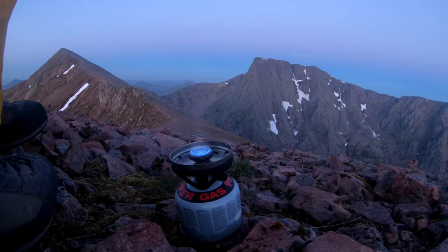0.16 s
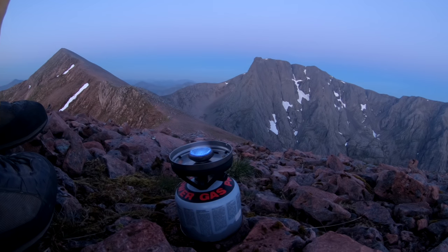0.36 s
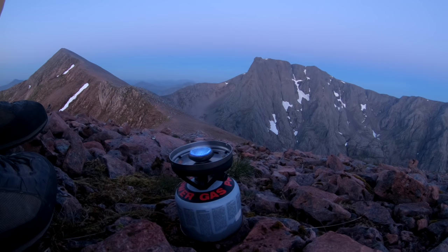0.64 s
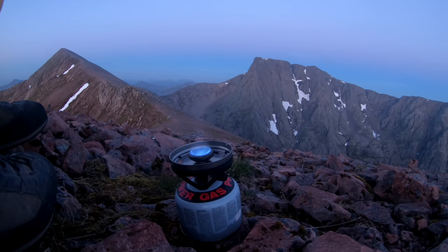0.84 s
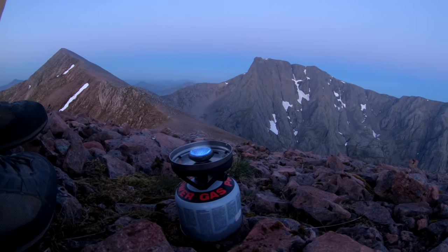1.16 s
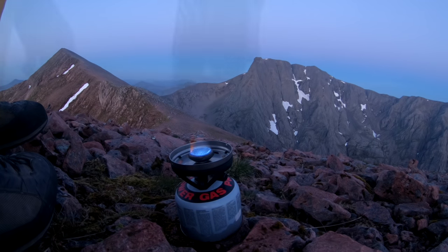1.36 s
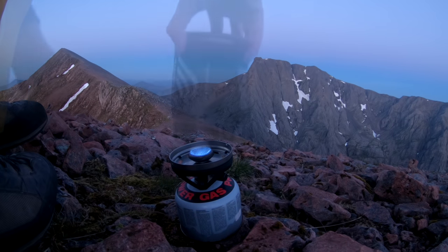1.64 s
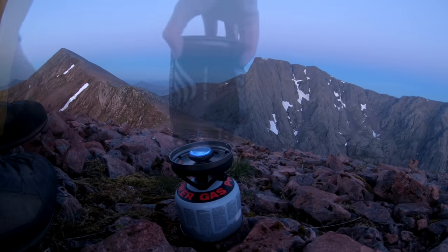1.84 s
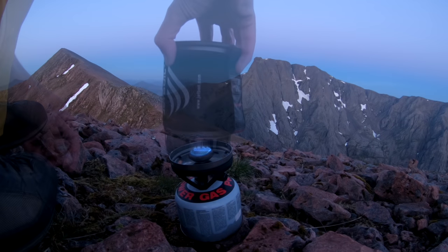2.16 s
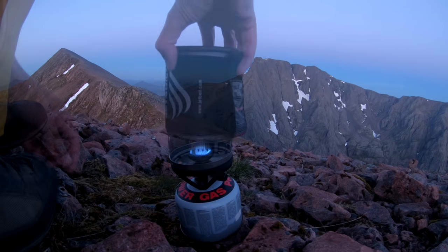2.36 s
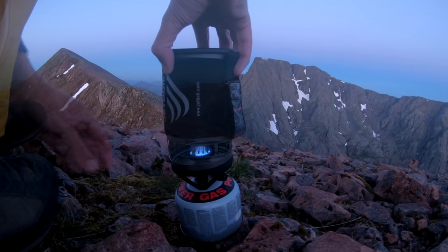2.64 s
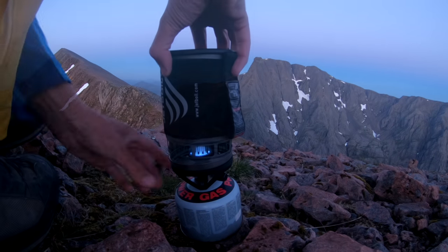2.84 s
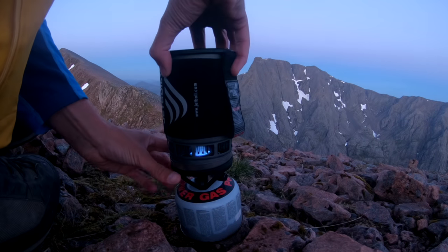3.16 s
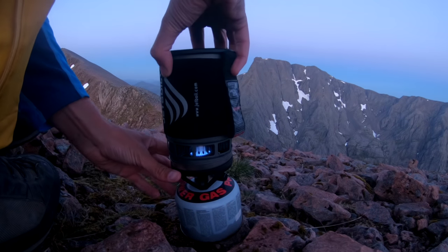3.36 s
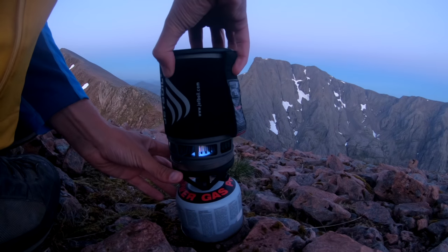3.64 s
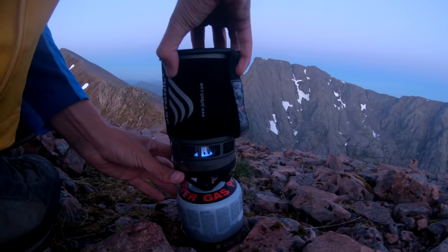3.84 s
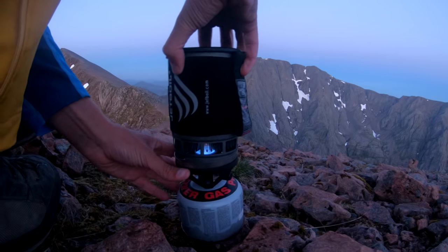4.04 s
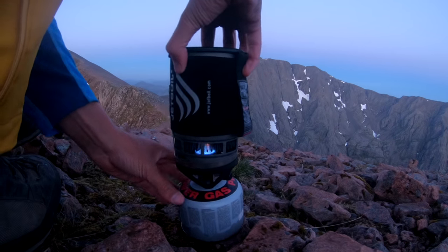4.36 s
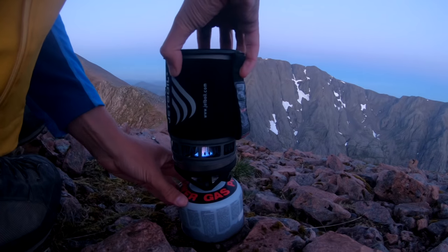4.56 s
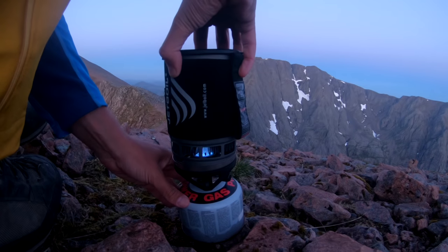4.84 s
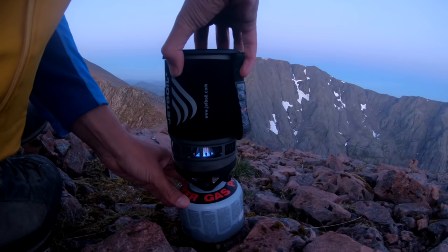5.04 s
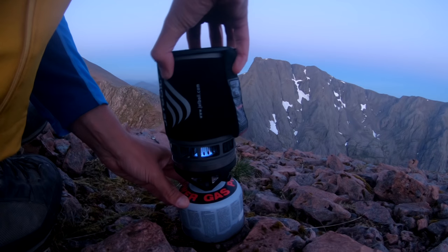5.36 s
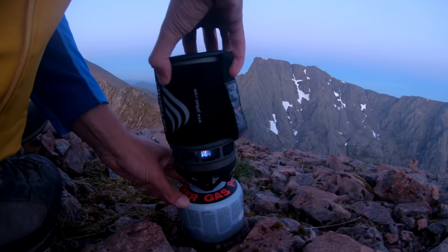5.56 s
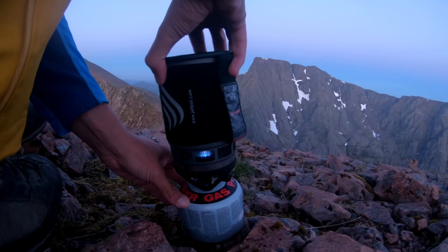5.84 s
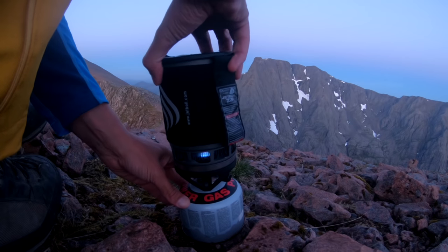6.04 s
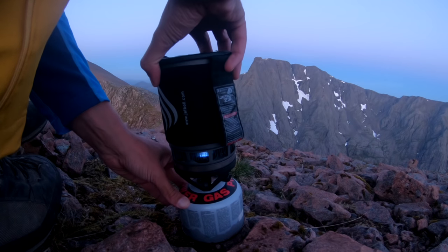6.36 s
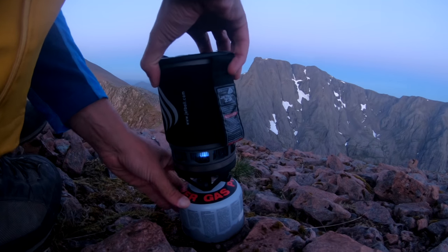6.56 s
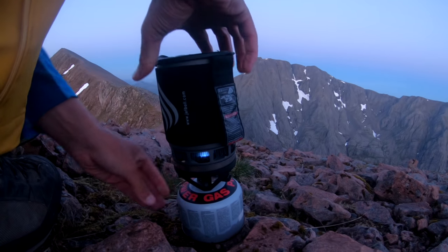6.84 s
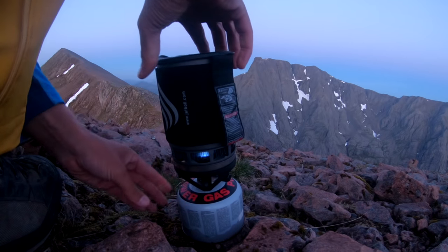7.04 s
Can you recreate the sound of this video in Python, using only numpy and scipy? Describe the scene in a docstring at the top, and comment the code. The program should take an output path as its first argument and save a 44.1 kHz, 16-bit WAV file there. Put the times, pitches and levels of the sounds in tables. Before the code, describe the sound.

A small gas stove roars and hisses steadily outdoors as a metal cup clinks, scrapes and knocks into place, dulling the hiss.

```python
"""A camping gas burner roars low and its jet hisses on an open, stony summit: coloured noise with random swells.
A loose stone chinks early on, as modes struck by a short burst of noise.
A metal cup lowered over the flame shuts the hiss in to dull vent noise; hand and cup brush in soft treble rustles.
Twisted home, it clinks and scrapes on the burner ring: modes excited by cracks and by dense tiny catches.
The canister knocks on the rock as short damped modes; a sleeve swishes in noise strokes as the hand draws back."""
import sys
import numpy as np
from scipy import signal
from scipy.fft import rfft, irfft
from scipy.io import wavfile
from scipy.ndimage import uniform_filter1d

SR = 44100
rng = np.random.default_rng(int(sys.argv[2]) if len(sys.argv) > 2 else 0)


def master_out(mix):
    """Clip the mix to full scale and print it as 16-bit PCM to the path in sys.argv[1]."""
    frames = np.transpose(np.atleast_2d(mix))
    ceiling = np.clip(frames, -1, 1)
    pcm = np.round(ceiling * 32767).astype(np.int16)
    wavfile.write(sys.argv[1], SR, pcm)


N = 317696
T = np.arange(N) / SR
FREQ = np.maximum(np.arange(N // 2 + 1) * SR / N, 1)


def undb(db):
    """Decibel law: the amplitude ratio of a level in dB."""
    return 10 ** (np.asarray(db) / 20)


def unit(x):
    """Normalisation: scale to rms 1."""
    return x / np.sqrt(np.mean(x ** 2))


def unit_attack(x):
    """Onset normalisation: scale a blow so that its first 5 ms have rms 1."""
    return x / np.sqrt(np.mean(x[:SR // 200] ** 2))


def curve(rows):
    """Level envelope: gain interpolated in dB along (start_s, level_db) points."""
    return undb(np.interp(T, *np.transpose(rows)))


def colour(x, points):
    """Linear filtering by a (pitch_hz, level_db) spectrum that falls 48 dB per octave beyond both ends."""
    hz, db = np.transpose(points)
    octaves_below = np.maximum(np.log2(hz[0] / FREQ), 0)
    octaves_above = np.maximum(np.log2(FREQ / hz[-1]), 0)
    gain_db = np.interp(np.log(FREQ), np.log(hz), db) - 48 * (octaves_below + octaves_above)
    return irfft(rfft(x) * undb(gain_db), N)


def noise(points):
    """Spectral shaping: white noise coloured to a spectrum, at rms 1."""
    return unit(colour(rng.standard_normal(N), points))


def walk(rate_hz):
    """Low-pass random modulation: a smooth fluctuation of rms 1, slower than about rate_hz."""
    spectrum = rfft(rng.standard_normal(N))
    return unit(irfft(spectrum / (1 + (FREQ / rate_hz) ** 4), N))


def steady(x, window_s):
    """Short-time levelling: take the slow swells out of a noise, leaving its quick turbulence."""
    return x / np.sqrt(uniform_filter1d(x ** 2, int(window_s * SR)) + 1e-9)


def since(s):
    """Elapsed time: seconds passed since s, zero before."""
    return np.maximum(T - s, 0)


def hump(middle_s, length_s):
    """Raised-cosine envelope: a smooth swell from 0 to 1 and back."""
    return np.cos(np.pi * np.clip((T - middle_s) / length_s, -.5, .5)) ** 2


def thinning(s, length_s, db):
    """Asymmetric envelope: a noise starts quickly, thins out by 12 dB over its length, then ends."""
    attack = np.minimum(since(s) / 0.069, 1)
    release = np.maximum(1 - since(s + length_s) / 0.05, 0)
    return attack * release * undb(db - 12 * since(s) / length_s)


def fade(t, t60):
    """Exponential decay: the amplitude falls 60 dB in t60 seconds."""
    return np.exp(-np.log(1000) * t / t60)


def ring(modes, detune=0, scatter_db=0):
    """Modal superposition: damped sines, with random phase and scattered pitch and strength."""
    t = T[:SR // 3]
    total = np.zeros(len(t))
    for hz, db, t60 in modes:
        pitch_chance, phase_chance, level_chance = rng.uniform(-1, 1, 3)
        phase = 2 * np.pi * hz * (1 + detune * pitch_chance) * t + np.pi * phase_chance
        total += undb(db + scatter_db * level_chance) * fade(t, t60) * np.sin(phase)
    return total


def add(out, s, x):
    """Superposition: mix x in at time s."""
    i = int(s * SR)
    out[i:i + len(x)] += x[:N - i]


def crack_noise(grit, s, t60, tail_db, tail_t60):
    """Impact noise: a piece of grit with a fast decay and a fainter, slower tail."""
    t = T[:SR // 3]
    return np.roll(grit, -int(s * SR))[:len(t)] * (fade(t, t60) + undb(tail_db) * fade(t, tail_t60))


def struck(rows, modes, crack_colour, crack_t60, scatter_db=0):
    """Impact excitation: the modes of one object ring over a short crack of noise."""
    out, t = np.zeros(N), T[:SR // 3]
    grit = noise(crack_colour)
    for s, ring_db, crack_db in rows:
        crack = crack_noise(grit, s, crack_t60, tail_db=-22, tail_t60=0.22)
        ringing = ring(modes, detune=0.0011, scatter_db=scatter_db)
        blow = undb(ring_db) * ringing + undb(crack_db) * crack
        add(out, s, blow * np.minimum(t / 0.0011, 1))  # 1.1 ms rise
    return out


# spectra of the roar and of the low flutter: pitch_hz [Hz], level_db [dB per Hz]
ROAR_SPECTRUM = [(90, -46.5), (125, -15), (150, 1), (185, -2.5), (215, -7), (270, -10), (330, -18),
                 (390, -22), (450, -28), (540, -36), (700, -40.5), (900, -59), (1300, -62)]
FLUTTER_SPECTRUM = [(15, -35), (28, -15.5), (48, -19.5), (80, -10.5), (110, -9), (150, -15.5), (300, -37.5)]
# filter for the deep part of the roar, which throbs and swells: pitch_hz [Hz], level_db [dB]
DEEP_FILTER = [(60, -4), (230, -6), (420, -10.5)]
# spectrum of the hollow middle range: pitch_hz [Hz], level_db [dB per Hz]
HOLLOW_SPECTRUM = [(350, -4.5), (560, 2), (700, 1), (830, -1), (950, -15.5), (1250, -23)]
# level of the hollow middle range: start_s [s], level_db [dB]
HOLLOW_LEVEL = [(0, -70.5), (1.5, -68.5), (2.4, -65.5), (3.6, -65.5), (4.15, -63), (4.5, -67), (4.7, -61.5),
                (5.05, -65.5), (5.95, -62.5), (6.55, -64), (6.78, -59.5), (7.2, -61.5)]
# strength of the flame before its parts are weighted: start_s [s], level_db [dB]
FLAME_LEVEL = [(0, -36.5), (2.0, -38.5), (3.1, -36.5), (3.6, -37.5), (4.2, -34), (5.0, -38), (6.7, -37),
               (7.2, -40.5)]
# puffs when a draught or the cup disturbs the flame:
# middle_s [s], length_s [s], roar_rise_db [dB], flutter_db [dB]
FLAME_PUFFS = [(0.21, 0.078, 5, -40.5), (0.532, 0.13, 3, -40.5), (0.91, 0.099, 9.5, -44.5),
               (1.149, 0.2, 9.5, -43), (1.531, 0.16, 7, -48), (1.773, 0.13, 5.5, -40.5),
               (1.867, .06, 14.5, -48), (2.193, 0.059, 18, -40.5), (2.357, .2, 10.5, -41.5),
               (2.528, 0.15, 13.5, -47), (2.861, 0.12, 12, -53), (3.245, 0.14, 1.5, -42.5),
               (3.768, 0.14, 13.5, -43.5), (3.851, 0.13, 14, -38.5), (4.708, 0.44, 4.5, -46),
               (5.094, 0.13, 7, -40.5), (5.5, 0.089, 14.5, -55.5), (5.606, 0.23, 12.5, -35.5),
               (6.834, 0.12, 8.5, -43)]
LOWER_S, SEAT_S = 1.19, 2.4  # the cup begins to sink; it sits on the burner ring


def flame():
    """Turbulent combustion noise: a roar with throbbing depth and hollow middle, over a low flutter."""
    deep_swell_db = 3 * walk(27)
    flutter_gain = undb(-52.5 + 0.5 * walk(5.8))  # flutter in calm air
    for middle_s, length_s, roar_rise_db, flutter_db in FLAME_PUFFS:
        puff = hump(middle_s, length_s)
        deep_swell_db = deep_swell_db + roar_rise_db * puff
        flutter_gain = flutter_gain + undb(flutter_db) * puff
    roar = steady(noise(ROAR_SPECTRUM), window_s=.12) * curve(FLAME_LEVEL)
    deep = colour(roar, DEEP_FILTER)
    # the upper part is weaker until the cup sits over the flame
    body = (roar - deep) * curve([(LOWER_S, -3), (SEAT_S, .7)])
    hollow = noise(HOLLOW_SPECTRUM) * curve(HOLLOW_LEVEL) * undb(1.1 * walk(28))
    flutter = steady(noise(FLUTTER_SPECTRUM), window_s=0.27) * flutter_gain
    return deep * undb(deep_swell_db) + body + hollow + flutter


# spectra of the open jet and the vents: pitch_hz [Hz], level_db [dB per Hz]
JET_SPECTRUM = [(1000, -30.5), (1400, -16.5), (1800, -3), (2550, 1), (3050, -7), (3650, -4.5), (4000, -6),
                (4300, -4.5), (5050, -10), (5800, 0), (6300, -7.5), (7400, -12), (8100, -14), (9500, -28.5)]
VENT_SPECTRUM = [(1280, -22.5), (1650, 0), (2050, 8), (2350, 0), (2750, -1), (3400, -12), (3700, -12),
                 (4000, -24), (5050, -26), (5600, -47)]
# burner through the vents of the cup, before a further 7 dB cut: start_s [s], level_db [dB]
VENT_LEVEL = [(0, -65), (1.5, -55.5), (2.4, -54), (3.2, -57), (4.15, -52), (5.3, -55), (6.05, -53.5),
              (6.5, -54.5), (6.9, -54.5), (7.02, -60.5), (7.2, -58)]
# the jet breaks out as the cup is lifted and reset: start_s [s], length_s [s], level_db [dB before thinning]
CUP_LIFT = (2.75, 0.6, -54)
# broad resonance of the burner head, screened and bared as cup and hand move: start_s [s], level_db [dB]
BURNER_HEAD_LEVEL = [(0, -56.5), (1.5, -61.5), (2.6, -63), (3.05, -56.5), (3.6, -67.5), (4.05, -66.5),
                     (4.45, -89), (4.9, -61), (5.1, -80.5), (5.85, -76.5), (6.03, -57.5), (6.5, -85.5),
                     (6.85, -70), (7.0, -57), (7.2, -59)]
SHUT_S = 2.987  # the cup begins to shut the jet in


def gas(burner_hz=2580):
    """Jet noise and screening: the open jet hisses; under the cup vents and head resonance remain."""
    # screening is far faster once the cup sits on the ring: 6, then 6 + 13.5 dB per second
    uncovered = undb(-52 - 6 * since(LOWER_S) - 13.5 * since(SEAT_S))
    shutting = undb(.5 * walk(39) - 118 * since(SHUT_S))  # 118 dB per second
    jet = noise(JET_SPECTRUM) * (uncovered + thinning(*CUP_LIFT)) * shutting
    vents = noise(VENT_SPECTRUM) * curve(VENT_LEVEL) * undb(-7.0 + 2.02 * walk(39))
    head_shape = [(0.66, -22), (.88, -11), (1, 0), (1.12, -10), (1.317, -18)]  # multiple of burner_hz, dB per Hz
    head_noise = noise([(ratio * burner_hz, db) for ratio, db in head_shape])
    head = head_noise * curve(BURNER_HEAD_LEVEL) * undb(2.0 * walk(17))
    return jet + vents + head


# pass bands of the cup's rim, wall and base: low_hz [Hz], high_hz [Hz]
CUP_BANDS = [(4860, 10000), (1490, 5000), (500, 1680)]
# modes of the cup: pitch_hz [Hz], level_db [dB], t60_s [s]
CUP_RESONANCES = [(627, -6.5, 0.18), (746, 9.5, 0.038), (960, -6.5, 0.028), (1845, 10.5, 0.052),
                  (1955, 14.5, 0.023), (2420, -1, 0.043), (3700, -2.5, 0.063), (3757, 1.5, 0.17),
                  (3880, -6, .07), (4800, -8.5, 0.099), (5240, -2, 0.075), (5650, 1, .07),
                  (5840, 2.5, 0.06), (5895, 8, 0.045), (6015, 2.5, .04), (6130, 5, 0.06), (6030, 1, .04),
                  (6450, -11, 0.09), (7200, -11, 0.071)]
# spectrum of the contact crack: pitch_hz [Hz], level_db [dB per Hz]
METAL_SPECTRUM = [(400, -13.5), (800, 13), (1300, -34), (1900, 8), (2700, 7.5), (3600, 5), (4200, 1),
                  (5000, 2.5), (6000, 8.5), (7300, -4.5), (9500, -7.5)]
# cup turning in the burner ring and catching: start_s [s], contact_s [s],
# rim_db [dB], wall_db [dB], base_db [dB], ring_share_db [dB, before a further 9 dB cut]
CUP_CLINKS = [(2.185, 0.0078, -64, -50, -91, -12), (2.324, 0.0033, -47, -44, -80, -5),
              (3.731, 0.0066, -48, -58.5, -49, -10), (3.807, 0.016, -68, -64.5, -56, -8.5),
              (3.8332, 0.0018, -33, -39, -37.5, -8), (3.844, 0.00096, -36, -41.5, -46, 0.5),
              (3.858, 0.0027, -46.5, -48.5, -65, -6.5), (4.052, 0.0022, -55.5, -60, -84, -19),
              (4.129, 0.0026, -65, -69, -51, -7), (4.244, 0.0044, -56, -55.5, -70.5, -26),
              (4.305, .0023, -56.5, -55, -71, -20), (5.314, 0.0054, -63.5, -64.5, -56, -14.5),
              (5.519, 0.0056, -57.5, -51.5, -52, -22), (5.762, 0.0038, -69, -61, -64, -27),
              (6.026, 0.0037, -62, -55, -74, -19), (6.101, 0.0023, -56, -52, -63, -18),
              (6.241, 0.0034, -71, -62, -86, -28)]


def cup_filters():
    """Band-pass filtering: one filter each for rim, wall and base."""
    return [signal.butter(3, band, "band", fs=SR, output="sos") for band in CUP_BANDS]


def clinks(crack_t60=0.0096, tail_db=-19, tail_t60=0.14, modes_db=-9):
    """Modal impact: each contact cracks and rings the hand-damped cup; its place weights rim, wall and base."""
    out, t = np.zeros(N), T[:SR // 3]
    grit = noise(METAL_SPECTRUM)
    filters = cup_filters()
    for s, contact_s, *part_db, ring_db in CUP_CLINKS:
        crack = crack_noise(grit, s, crack_t60, tail_db, tail_t60)
        ringing = ring(CUP_RESONANCES, detune=0.005, scatter_db=1.5)
        blow = crack + undb(modes_db + ring_db) * ringing
        blow = blow * np.minimum(t / contact_s, 1)  # the force builds up over the contact
        for sos, db in zip(filters, part_db):
            add(out, s, undb(db) * unit_attack(signal.sosfilt(sos, blow)))
    return out


# spectrum of the sliding contact: pitch_hz [Hz], level_db [dB per Hz, shapes the rasp]
SLIDE_SPECTRUM = [(1500, -10.5), (2600, -8), (3600, -7.5), (4150, -9.5), (4900, -8), (6000, -9),
                  (6800, -12.5), (7500, -23), (9000, -35)]
# cup base rubbing on the burner ring: start_s [s], length_s [s], level_db [dB, before build-up and unevenness]
CUP_RUBS = [(2.519, 0.016, -55), (3.802, 0.012, -64), (3.942, 0.015, -61), (4.128, 0.021, -59.5),
            (4.266, 0.054, -62), (4.606, 0.1, -70.5), (4.8, 0.042, -81.5), (5.452, 0.019, -63),
            (5.512, .03, -67), (5.539, 0.094, -52.5), (5.765, .04, -72.5), (5.853, 0.014, -69),
            (5.894, 0.053, -53.5), (5.995, 0.031, -59.5), (6.058, 0.047, -57.5), (6.728, 0.071, -67)]


def scrape(grain_db=2.5, grains_per_s=4500, ring_db=-20, unevenness_db=2.5, wander_db=2.5):
    """Stick-slip friction: dense tiny catches, smeared by the thin metal, excite the cup base."""
    happens = rng.random(N) < grains_per_s / SR
    strength = undb(grain_db * np.minimum(rng.exponential(size=N), 3))
    catches = happens * rng.choice([-1, 1], N) * strength
    t = T[:SR // 50]
    # the point of contact wanders, so each part of the cup answers with its own strength
    rasp = 0
    for sos in cup_filters():
        smear = rng.standard_normal(len(t)) * fade(t, .008)
        part = signal.sosfilt(sos, signal.fftconvolve(catches, smear)[:N])
        rasp = rasp + part * undb(wander_db * walk(45))
    rasp = unit(colour(rasp, SLIDE_SPECTRUM))
    singing = unit(signal.fftconvolve(rasp, ring(CUP_RESONANCES))[:N])
    pressure = np.zeros(N)
    for s, length_s, db in CUP_RUBS:
        grip = np.minimum(since(s) / .018, 1)
        easing = fade(since(s + length_s), 0.15)  # the hand eases
        pressure += undb(db) * grip * easing
    return pressure * undb(unevenness_db * walk(60)) * (rasp + undb(ring_db) * singing)


# cup base landing on the prongs of the burner: start_s [s], ring_db [dB], crack_db [dB]
PRONG_TAPS = [(2.313, -53, -48), (2.326, -45, -40), (2.5, -41, -41), (2.5025, -33.5, -37.5)]
# modes of the burner prongs: pitch_hz [Hz], level_db [dB], t60_s [s]
PRONG_RESONANCES = [(1805, -2.5, .018), (1907, 3, 0.029), (2080, -4.5, 0.031), (2536, -4, 0.056),
                    (2790, -3.5, 0.022), (3480, -9, .025), (3590, -0.5, 0.03), (3980, -6, 0.022),
                    (4370, -9, 0.022), (4760, -1, 0.052), (4870, -11, .02), (5060, -11, 0.082)]
# spectrum of the crack on a prong: pitch_hz [Hz], level_db [dB per Hz]
PRONG_SPECTRUM = [(1650, -14), (2800, 4), (4800, -1), (6500, -3), (9000, -12)]


def taps():
    """Modal impact: the descending cup finds the thin prongs of the burner, which ring briefly."""
    return struck(PRONG_TAPS, PRONG_RESONANCES, PRONG_SPECTRUM, crack_t60=0.022, scatter_db=-2.0)


# spectrum of the brushing: pitch_hz [Hz], level_db [dB per Hz]
BRUSH_SPECTRUM = [(3000, -11.5), (3700, 8), (4100, -17.5), (4600, -6), (4850, 4.5), (5300, 0), (5950, 4),
                  (6600, -7), (7300, -13), (8200, -23.5)]
# light brushing of hand and cup: start_s [s], length_s [s], level_db [dB before thinning and unevenness]
CUP_BRUSHES = [(3.135, 0.42, -68.5), (3.586, 0.36, -72), (3.847, 0.25, -66.5), (4.097, 0.37, -70.5),
               (4.566, 0.5, -78.5), (5.004, 0.49, -78), (5.412, 0.39, -68.5), (5.99, 0.18, -75),
               (6.732, 0.11, -72), (6.888, 0.15, -71.5)]


def brushing(unevenness_db=3.4):
    """Light friction noise: hand and cup brush in soft treble rustles that start quickly and thin out."""
    strokes = undb(-99) + sum(thinning(*row) for row in CUP_BRUSHES)  # over a very faint steady floor
    return noise(BRUSH_SPECTRUM) * strokes * undb(unevenness_db * walk(30))


# canister tipping and knocking on the rock: start_s [s], ring_db [dB], crack_db [dB]
CANISTER_KNOCKS = [(5.5815, -34, -40), (5.6195, -35, -34)]
# modes of the full canister, soon damped: pitch_hz [Hz], level_db [dB], t60_s [s]
CANISTER_RESONANCES = [(208, 5.5, 0.028), (378, 2.5, 0.045), (574, -7.5, 0.012), (776, -2, .035),
                       (928, -3.5, 0.026), (1080, -3, 0.03), (1870, 2.5, .016), (2420, -12, 0.024),
                       (3000, 2, 0.016), (3490, 4.5, 0.019), (3800, -8, 0.037), (5060, -5, 0.03),
                       (6600, -13, 0.022)]
# spectrum of the canister's crack: pitch_hz [Hz], level_db [dB per Hz]
CANISTER_SPECTRUM = [(400, -7.5), (1100, 14), (1450, -0.5), (3500, 2), (5500, 0), (9000, -14.5)]


def knocks():
    """Heavily damped impact: the tipped canister falls back on the rock with a dead double knock."""
    return struck(CANISTER_KNOCKS, CANISTER_RESONANCES, CANISTER_SPECTRUM, crack_t60=0.028, scatter_db=1.5)


# jolts of the whole stove on the stony ground: start_s [s], bump_db [dB], grinding_db [dB]
STOVE_JOLTS = [(2.516, -42.5, -61), (3.738, -27, -62.5), (3.77, -36, -54), (3.84, -26, -40),
               (3.868, -31, -52.5), (5.524, -45, -46), (5.579, -23.5, -44), (5.593, -36, -40),
               (5.612, -24, -47), (5.637, -29.5, -55.5), (5.681, -33, -50.5), (6.886, -31.5, -52)]
# spectrum of the canister foot grinding on gravel: pitch_hz [Hz], level_db [dB per Hz]
GRIND_SPECTRUM = [(180, 9.5), (380, 3.5), (540, -2.5), (830, 0), (1120, -9.5), (1500, -16.5), (2500, -3)]


def jolts(rock_hz=80, can_hz=135, can_db=-3, t60=0.1, push_s=0.01, grind_t60=0.17):
    """Damped oscillation and friction: a push rocks the canister with a dull bump and grinds its foot."""
    out, grinding, t = np.zeros(N), np.zeros(N), T[:SR // 3]
    tones = np.sin(2 * np.pi * rock_hz * t) + undb(can_db) * np.sin(2 * np.pi * can_hz * t)
    bump = tones * fade(t, t60) * np.minimum(t / push_s, 1)
    grind = fade(t, grind_t60) * np.minimum(t / 0.0057, 1)
    for s, bump_db, grind_db in STOVE_JOLTS:
        add(out, s, undb(bump_db) * bump)
        add(grinding, s, undb(grind_db) * grind)
    return out + grinding * noise(GRIND_SPECTRUM) * undb(1.0 * walk(70))


# a loose stone rocking: start_s [s], chink_db [dB], grit_db [dB]
STONE_CHINKS = [(1.837, -34.5, -44), (1.864, -46.5, -51), (1.922, -63.5, -50.5)]
# modes of the stone: pitch_hz [Hz], level_db [dB], t60_s [s]
STONE_RESONANCES = [(730, -17, 0.048), (1113, -29, 0.11), (1260, -5.5, 0.038), (1787, 1.5, 0.19),
                    (1792, -8.5, 0.62), (2000, -4, 0.043), (2540, -17, .08), (3550, -1.5, 0.026),
                    (3677, -24.5, 0.37)]
# spectrum of the contact on stone: pitch_hz [Hz], level_db [dB per Hz]
STONE_SPECTRUM = [(400, 5), (1300, -5), (2500, 4), (3800, -18)]


def stone():
    """Modal impact: a hard slab tips on its neighbour with a clear, thinly ringing chink and gritty settling."""
    return struck(STONE_CHINKS, STONE_RESONANCES, STONE_SPECTRUM, crack_t60=0.13)


# strokes of the sleeve: middle_s [s], length_s [s], pitch_hz [Hz, centre], level_db [dB, before creases]
SLEEVE_STROKES = [(6.902, 0.092, 790, -57), (6.92, 0.16, 1360, -68.5), (6.995, .04, 824, -52),
                  (7.033, 0.13, 813, -55), (7.06, 0.27, 1135, -63)]
# spectrum of a stroke: pitch_ratio [multiple of its centre], level_db [dB per Hz]
STROKE_SPECTRUM = [(.7, -18), (.92, -1), (1.08, 1), (1.22, -12), (1.7, -18.5)]


def sleeve(crease_db=2):
    """Friction noise: jacket cloth slides over itself in a few strokes, unevenly as its creases catch."""
    strokes = np.zeros(N)
    for middle_s, length_s, centre_hz, db in SLEEVE_STROKES:
        swish = noise([(ratio * centre_hz, tilt_db) for ratio, tilt_db in STROKE_SPECTRUM])
        strokes += hump(middle_s, length_s) * undb(db) * swish
    return strokes * undb(crease_db * walk(30))


def scene():
    """Free-field superposition: in open air every source arrives dry."""
    burner = flame() + gas()
    cup = clinks() + scrape() + taps() + brushing()
    ground = knocks() + jolts() + stone()
    return (burner + cup + ground + sleeve())[None]


def record(dry):
    """Band limitation: the small microphone falls off abruptly above 7410 Hz and adds a faint hiss."""
    response = [(10, 0), (7410, 0), (8080, -24), (8500, -14), (9300, -20), (10000, -40)]  # Hz, dB
    heard = colour(dry[0], response) + undb(-92) * rng.standard_normal(N)
    low_pass = signal.ellip(8, .2, 70, 15700, fs=SR, output="sos")  # also limits the hiss
    return signal.sosfilt(low_pass, heard)[None]


dry = scene()
out = record(dry)
master_out(out)
```